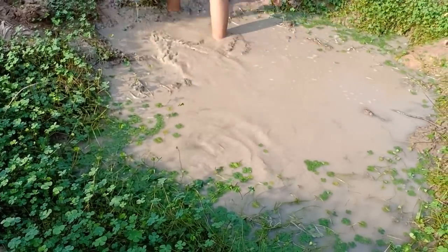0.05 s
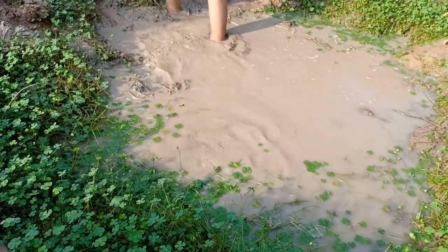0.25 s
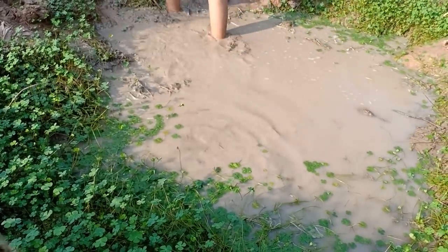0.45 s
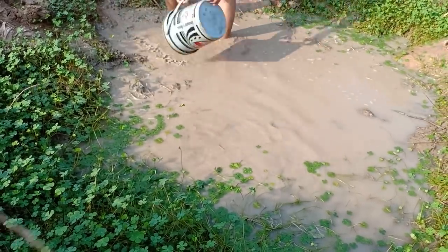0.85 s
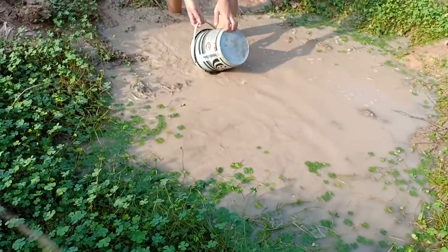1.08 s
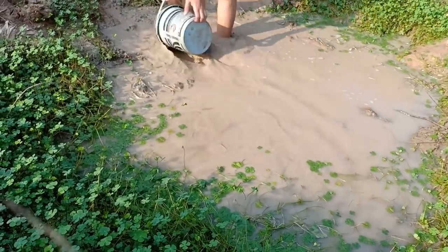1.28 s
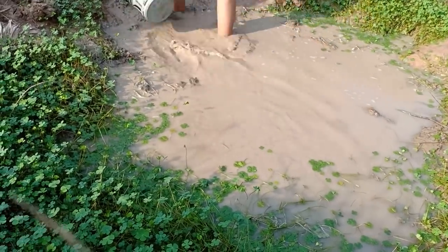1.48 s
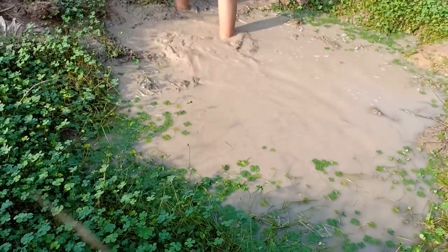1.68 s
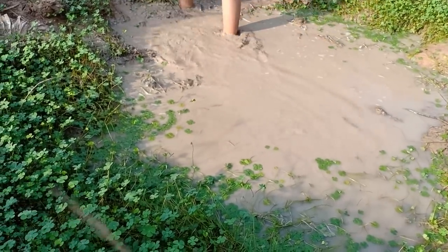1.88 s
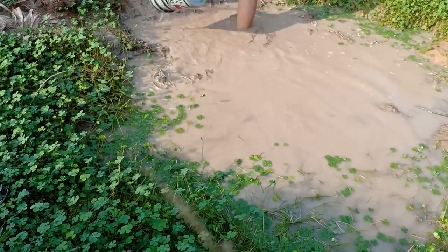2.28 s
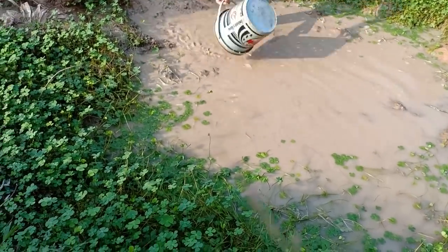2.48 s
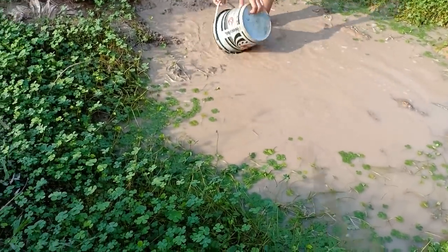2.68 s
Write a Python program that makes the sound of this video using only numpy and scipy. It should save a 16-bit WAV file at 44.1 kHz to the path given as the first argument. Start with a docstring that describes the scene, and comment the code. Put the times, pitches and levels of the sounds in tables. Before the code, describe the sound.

Water splashes in a shallow outdoor pool as a plastic bucket bails it. The first throw swells and lands with a broad slap at 0.4 seconds, then patters away. The bucket dips with a gurgle and soft knock around 1 second. Drips lead into a second splash at 1.9 seconds. Another scoop knocks and gurgles near 2.5 seconds. Small birds chirp faintly over a low rumble.

```python
"""Small birds call over a faint outdoor rumble as a plastic bucket scoops a shallow muddy pool.
The first throw swells into a rush of drops and bubbles, lands with a broad slap at 0.4 s and patters away.
The water laps, and the bucket gulps air with a low knock. A second throw lands at 1.9 s.
Near 2.5 s the bucket dips again, knocking and gurgling under a few faint, high bird calls."""
import sys
import numpy as np
from scipy import signal
from scipy.fft import rfft, irfft
from scipy.io import wavfile
from scipy.ndimage import uniform_filter1d

SR = 44100
rng = np.random.default_rng(int(sys.argv[2]) if len(sys.argv) > 2 else 0)


def dump_mix(stems):
    """Bounce the given channels to the path in sys.argv[1] as a 16-bit WAV at rate SR."""
    frames = np.atleast_2d(stems).T  # one column per channel
    limited = np.clip(frames, -1, 1)  # hard clip at full scale
    pcm = np.round(limited * 32767).astype(np.int16)
    wavfile.write(sys.argv[1], SR, pcm)


N = 125685

BUBBLE_CYCLES = 5.06  # vibrations before a bubble fades to about a third
SPATTER_PER_S = 6500


def undb(db):
    """Turn decibels into a number to multiply by."""
    return 10 ** (np.asarray(db) / 20)


def unit(x):
    """Scale a sound to an average power of 1."""
    return x / np.sqrt(np.mean(x ** 2) + 1e-18)


def curve(rows):
    """Loudness over time, drawn through points of (time [s], level [dB])."""
    return undb(np.interp(np.arange(N) / SR, *np.array(rows).T))


def colour(x, rows, share=1):
    """Shape the tone with points of (frequency [Hz], level [dB]); share scales the levels."""
    size = 4096
    hz, db = np.array(rows, float).T
    f = np.maximum(np.arange(size // 2 + 1) * SR / size, 1)
    gain = undb(share * np.interp(np.log(f), np.log(hz), db))
    cepstrum = irfft(np.log(gain))
    cepstrum[1:size // 2] *= 2  # folded so the filter rings only after a hit, never before
    cepstrum[size // 2 + 1:] = 0
    return signal.fftconvolve(x, irfft(np.exp(rfft(cepstrum))))[:len(x)]


def spread(pair, tone):
    """Give a (middle, side) pair a tone and turn it into left and right; high sounds are widest."""
    # how wide the sound is (frequency [Hz], side level [dB])
    width = [(60, -26.5), (200, -14), (400, -5), (700, -7), (1300, -8.5), (2400, -2.5), (4400, 0),
             (8000, 3), (15000, -1)]
    # lean to the left, of which each ear takes a share (frequency [Hz], lean before sharing [dB])
    lean = [(100, -0.5), (380, 2.5), (700, 0), (1300, 1), (2300, 6.5), (4400, -0.5), (8000, 2), (15000, -2)]
    gain = 1 / np.linalg.norm(colour(signal.unit_impulse(SR // 20), tone))  # the tone adds no power
    mid = colour(pair[0], tone)
    side = colour(colour(pair[1], tone), width)
    return gain * np.array([colour(mid + side, lean, 0.65), colour(mid - side, lean, -0.098)])


def add(out, start_s, x, left_db=0):
    """Mix in a short sound, left_db louder on the left than on the right."""
    i = int(start_s * SR)
    x, i = x[max(-i, 0):], max(i, 0)
    x = x[:max(N - i, 0)]
    out[:, i:i + len(x)] += x * undb(np.array([[left_db], [-left_db]]) / 2)


def tremble(per_s):
    """A smooth random wobble, about 1 in size."""
    size = int(SR / per_s)
    return unit(uniform_filter1d(uniform_filter1d(rng.standard_normal(N), size), size))


def bursts(rows, rise_s=0.001):
    """Loudness of sudden bursts (time [s], level [dB], fade [s]); a fade is a fall of 60 dB."""
    t, power = np.arange(N) / SR, np.zeros(N)
    for start, db, fade_s in rows:
        rise = np.clip((t - start) / rise_s, 0, 1)
        fade = np.exp(-np.log(1000) * np.abs(t - start) / fade_s)
        power += (rise * undb(db) * fade) ** 2
    return np.sqrt(power)


def clicks(per_s, uneven_db):
    """Drops of uneven size hit at random, as a (middle, side) pair."""
    size = undb(uneven_db * np.minimum(rng.exponential(size=N), 4))
    hits = (rng.random(N) < per_s / SR) * size * rng.choice([-1, 1], N)
    return np.array([unit(hits), unit(hits * rng.standard_normal(N))])


def ring(hz, fade_s, rise_cycles, glide_per_s=0):
    """Air trapped in water rings: it swells quickly and fades, and any glide lifts its pitch."""
    t = np.arange(int(SR * fade_s) + 1) / SR
    rise = 1 - np.exp(-t * hz / rise_cycles)
    fade = np.exp(-np.log(1000) * t / fade_s)
    return rise * fade * np.sin(2 * np.pi * hz * t * (1 + glide_per_s * t / 2))


def bubbles(per_s, low_hz, high_hz, cycles):
    """A cloud of briefly ringing bubbles, as a (middle, side) pair."""
    out = np.zeros((2, N))
    draws = rng.random((2 ** 13, 4))[:int(per_s * N / SR)]
    for when, pitch, size, side in draws:
        hz = low_hz + (high_hz - low_hz) * pitch
        life_s = cycles / hz
        gain = np.sqrt(hz) * undb(-3 * np.log(size + 0.02))  # many quiet, a few loud
        ping = gain * ring(hz, np.log(1000) * life_s, rise_cycles=0.27, glide_per_s=0.029 / life_s)
        i = int(when * N)
        out[:, i:i + len(ping)] += np.outer([1, 2 * side - 1], ping[:N - i])
    return np.array([unit(out[0]), unit(out[1])])


def outdoors():
    """A steady distant hiss and a low rumble."""
    # tones of the hiss and the rumble (frequency [Hz], relative level [dB])
    hiss_tone = [(40, 6), (110, 18.5), (400, 5), (750, -8), (1500, -10), (2400, -17), (3300, -28),
                 (5800, -16), (8000, -29), (15500, -30)]
    rumble_tone = [(20, -35), (40, -7.5), (65, 3), (110, 2.5), (170, -2), (300, -14), (800, -46)]
    hiss = undb(-59.5) * spread(rng.standard_normal((2, N)), hiss_tone)
    rumble = undb(-47.5) * spread(rng.standard_normal((2, N)), rumble_tone)
    return hiss + rumble


def birds():
    """Small birds give thin, wavering whistles, mostly from the left."""
    # whistles (time [s], length [s], first pitch [Hz], middle [Hz], last [Hz], level [dB], left [dB])
    calls = [(-.005, .045, 3500, 4000, 5400, -44, 7), (.036, .022, 5200, 4150, 5300, -47, 6),
             (.752, .05, 4880, 4700, 4050, -43, 8), (.796, .068, 4200, 3380, 3600, -53, 7),
             (1.448, .045, 3900, 4950, 4300, -43, 6), (1.499, .05, 3750, 4450, 5000, -43, 8),
             (1.54, .025, 4750, 4950, 3700, -41, 8), (1.563, .021, 3900, 4350, 3750, -46, 6),
             (2.22, .19, 6300, 7350, 7550, -66, 1), (2.55, .16, 6850, 7550, 7750, -64, 1),
             (2.77, .1, 6150, 6550, 6900, -64, 1)]
    out = np.zeros((2, N))
    waver = tremble(per_s=520)
    for start, length, first, middle, last, db, left_db in calls:
        progress = np.linspace(0, 1, int(length * SR))
        wobble = np.roll(waver, -int(start * SR))
        tune = np.polyval(np.polyfit([0, .5, 1], [first, middle, last], 2), progress)
        hz = tune * (1 + .021 * wobble[:len(progress)])
        level = undb(db + 4 * wobble[-len(progress):])
        swell = np.sqrt(2 * np.abs(np.sin(np.pi * progress)))
        add(out, start, level * swell * np.sin(2 * np.pi * np.cumsum(hz) / SR), left_db)
    return out


def fizz():
    """The finest droplets make a high, crackling fizz."""
    # strength of the fizz (time [s], level [dB])
    levels = [(.06, -67.5), (.22, -64), (.33, -61), (.39, -44.5), (.47, -59.5), (.58, -54), (.75, -68.5),
              (1.15, -70.5), (1.44, -52), (1.57, -73.5), (1.7, -60), (1.88, -64.5), (1.94, -43),
              (2.05, -58), (2.12, -53.5), (2.25, -69), (2.68, -63.5), (2.85, -70)]
    # its tone (frequency [Hz], relative level [dB])
    tone = [(5000, -73), (7500, 6), (11000, 1.5), (15000, 6.5)]
    droplets = undb(-1) * clicks(per_s=2700, uneven_db=-4)
    crackle = undb(-3) * clicks(per_s=130, uneven_db=2)
    return spread((droplets + crackle) * curve(levels), tone)


def gurgle():
    """Big bubbles ring low as water flows around and into the bucket."""
    # strength of the gurgle (time [s], level [dB])
    levels = [(.25, -73), (.36, -44), (.48, -32.5), (.58, -50.5), (.68, -48), (.87, -76), (.92, -41),
              (1.0, -63), (1.07, -45), (1.19, -51.5), (1.4, -45), (1.7, -70), (1.88, -42.5), (2.03, -45.5),
              (2.15, -59), (2.41, -60), (2.46, -42), (2.55, -53), (2.66, -39), (2.78, -56)]
    return bubbles(per_s=170, low_hz=174, high_hz=769.5, cycles=BUBBLE_CYCLES)[0] * curve(levels)


def spray():
    """Fine spray patters down, with plips from tiny bubbles that never grow loud."""
    # strength of the spray (time [s], relative level [dB])
    levels = [(0, -59), (.07, -48.5), (.12, -46.5), (.23, -38), (.345, -43), (.395, -18), (.46, -46),
              (.58, -40.5), (.66, -51.5), (.88, -57.5), (1.13, -50.5), (1.41, -48.5), (1.46, -38),
              (1.58, -57.5), (1.65, -55.5), (1.69, -38), (1.9, -50), (1.935, -23.5), (1.98, -33.5),
              (2.05, -45), (2.15, -43), (2.24, -56.5), (2.41, -59.5), (2.47, -51), (2.56, -57.5),
              (2.68, -41.5), (2.74, -51), (2.85, -54.5)]
    # its tone (frequency [Hz], relative level [dB])
    tone = [(1500, -17), (3000, 11.5), (4300, 4.5), (5000, 9), (6000, 10.5), (6700, -0.5), (7400, -2),
            (8000, -37), (11500, -12), (15500, -10)]
    strength = curve(levels)
    mist = undb(-6.5) * clicks(per_s=2200, uneven_db=2)
    plips = undb(-10.5) * bubbles(per_s=330, low_hz=3200, high_hz=7800, cycles=14)
    return spread(mist * strength + plips * np.minimum(strength, undb(-40)), tone)


def drips():
    """Fat drops fall into the pool, each ringing one small bubble."""
    # single drops (time [s], pitch [Hz], level [dB])
    drops = [(0.145, 2050, -20), (0.254, 2540, -19), (.279, 884, -11.5), (.361, 1490, -10.5),
             (.524, 915, -12.5), (1.128, 2180, -20), (1.294, 2670, -27), (1.375, 2300, -22.5),
             (1.667, 2500, -28.5), (1.691, 2420, -16), (1.717, 2390, -17.5), (1.727, 1420, -15),
             (1.744, 2400, -16.5), (1.75, 1950, -13), (1.76, 2520, -19), (1.861, 2490, -10),
             (1.902, 2600, -16)]
    out = np.zeros((2, N))
    for start, hz, db in drops:
        add(out, start, undb(db) * ring(hz, fade_s=0.02, rise_cycles=2.37, glide_per_s=1), left_db=4)
    return out


def ticks(fade_s=0.023):
    """Water smacks the bucket wall in tight, bright clusters of droplets."""
    # smacks (time [s], level [dB])
    smacks = [(0.394, -19.5), (.409, -20), (0.709, -35.5), (1.128, -34), (1.17, -29.5), (1.19, -34),
              (1.248, -37), (1.429, -35.5), (1.929, -25), (2.183, -29), (2.522, -38), (2.542, -25.5),
              (2.595, -29)]
    # their tone (frequency [Hz], relative level [dB])
    tone = [(600, -32), (2400, 2.5), (3300, -4), (5300, 6), (7000, -6), (8500, -21), (15000, -21)]
    strength = bursts([(start, db, fade_s) for start, db in smacks])
    return spread(clicks(SPATTER_PER_S, uneven_db=2) * strength, tone)


def knocks():
    """Big air pockets close with a hollow thud; the shallow water gives off little bass."""
    # thuds (time [s], pitch [Hz], level before the bass cut [dB], fade [s])
    thuds = [(.393, 299, 6.5, 0.021), (.401, 490, -7.5, 0.03), (1.039, 478, -12, 0.023),
             (1.931, 202, -14, 0.032), (1.936, 546, -14.5, 0.035), (2.439, 219, -26, 0.052),
             (2.472, 290, -17.5, 0.022), (2.5951, 289, 4.5, 0.022)]
    out = np.zeros((2, N))
    for start, hz, db, fade_s in thuds:
        note = ring(hz, fade_s, rise_cycles=1)
        overtone = undb(-8) * ring(hz * 1.426, fade_s, rise_cycles=1)
        add(out, start, undb(db) * (note + overtone))
    return signal.sosfilt(signal.butter(2, 165, "highpass", fs=SR, output="sos"), out)


def churning():
    """Scooped and thrown water swells into a rush of drops and bubbles."""
    # how hard the water churns (time [s], relative level [dB])
    levels = [(0, -51), (.08, -52), (.15, -41), (.28, -29), (.345, -31.5), (.395, -22.5), (.45, -32.5),
              (.53, -28.5), (.6, -41.5), (.72, -49), (.88, -51), (.94, -43.5), (1.02, -48), (1.12, -38),
              (1.21, -49), (1.33, -39), (1.41, -45.5), (1.56, -51.5), (1.655, -58), (1.685, -39),
              (1.78, -31), (1.87, -29.5), (1.93, -22.5), (1.965, -29.5), (2.0, -25), (2.05, -34),
              (2.16, -37), (2.24, -48), (2.41, -54), (2.47, -36.5), (2.52, -47.5), (2.56, -51), (2.6, -39),
              (2.67, -36), (2.85, -55)]
    # tone of the splash (frequency [Hz], relative level [dB])
    tone = [(100, -43), (190, -11), (370, -40.5), (560, -2), (710, -13.5), (815, 3.5), (930, -0.5),
            (1060, -3), (1280, 1.5), (1750, -5), (2050, 1), (2200, -2.5), (2450, 0.5), (2850, -4),
            (3200, -18.5), (4400, -10.5), (5600, -10.5), (7000, -20.5), (8000, -65), (15500, -57)]
    drops = undb(-8) * clicks(per_s=3500, uneven_db=1)
    froth = undb(-11) * bubbles(per_s=1600, low_hz=225, high_hz=3620, cycles=BUBBLE_CYCLES)
    return spread((drops + froth) * curve(levels), tone)


def slaps():
    """Each slap of water throws spatter and rings an air pocket, which shudders as the water moves."""
    # slaps (time [s], pocket pitch [Hz], its level [dB], its fade [s], spatter level [dB], its fade [s])
    hits = [(0.09, 1900, -26.5, 0.026, -32.5, 0.054), (0.102, 530, -25, 0.016, -37.5, .04),
            (.193, 2290, -28, 0.12, -32, 0.064), (.379, 870, -9.5, 0.037, -39, 0.07),
            (0.3909, 906, -10, 0.04, -13, 0.039), (0.408, 2860, -15, 0.042, -14.5, 0.035),
            (0.423, 868, -22.5, 0.18, -23.5, 0.1), (0.988, 1950, -35, .02, -31.5, 0.015),
            (1.040, 957, -13.5, 0.037, -29.5, 0.12), (1.094, 627, -17.5, 0.05, -29.5, 0.051),
            (1.168, 990, -25.5, 0.028, -28, 0.019), (1.25, 1024, -26, 0.055, -36, 0.053),
            (1.353, 2070, -25, 0.033, -27.5, 0.048), (1.456, 2456, -27.5, 0.045, -33.5, 0.096),
            (1.484, 1740, -24, 0.02, -29.5, 0.067), (1.62, 1850, -32, 0.04, -36.5, 0.092),
            (1.925, 1370, -8, 0.019, -16, 0.047), (1.933, 1720, -8.5, 0.022, -19, 0.017),
            (1.936, 928, -15, 0.037, -37, 0.027), (2.474, 1136, -21, 0.017, -35, 0.057),
            (2.541, 970, -3.5, 0.009, -28, 0.018), (2.792, 970, -40, 0.054, -35, 0.042)]
    # tone of the spatter (frequency [Hz], relative level [dB])
    tone = [(120, -66), (300, -6), (520, 4), (700, -12.5), (900, -0.5), (1100, -1), (1500, 6), (2600, 2),
            (3400, -8.5), (4400, -14.5), (5600, -13), (7200, -25), (8200, -28), (15500, -40)]
    pockets = np.zeros((2, N))
    for start, hz, db, fade_s, _, _ in hits:
        add(pockets, start, undb(db) * ring(hz, fade_s, rise_cycles=0.82, glide_per_s=1), left_db=2.4)
    shudder = 1 + 0.35 * tremble(per_s=420)
    strength = bursts([(start, db, fade_s) for start, _, _, _, db, fade_s in hits])
    spatter = clicks(SPATTER_PER_S, uneven_db=3) * strength
    return pockets * shudder + spread(spatter, tone)


def scene():
    """Water and birds echo faintly off the leafy banks, over the sound of the open air."""
    echo_fade_s, echo_db = 0.094, -11.5
    t = np.arange(SR // 2) / SR
    scatter = rng.standard_normal((2, len(t))) * np.exp(-np.log(1000) * t / echo_fade_s)
    scatter /= np.linalg.norm(scatter, axis=1, keepdims=True)
    direct = churning() + spray() + gurgle() + fizz() + slaps() + drips() + ticks() + knocks() + birds()
    echo = undb(echo_db) * signal.fftconvolve(direct, scatter, axes=1)[:, :N]
    return direct + echo + outdoors()


def record(dry):
    """The highest treble, above 15400 Hz, is cut away."""
    return signal.sosfilt(signal.ellip(10, .2, 80, 15400, fs=SR, output="sos"), dry)


dry = scene()
out = record(dry)
dump_mix(out)
```